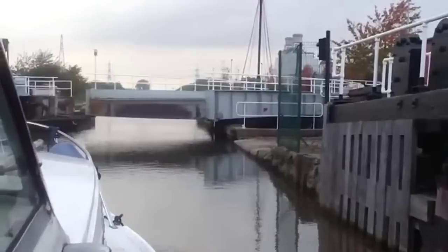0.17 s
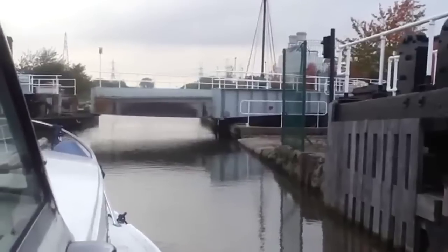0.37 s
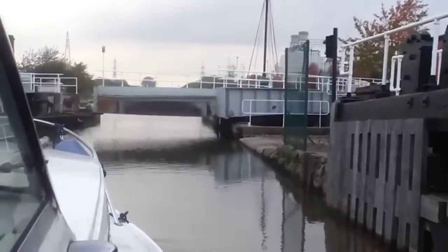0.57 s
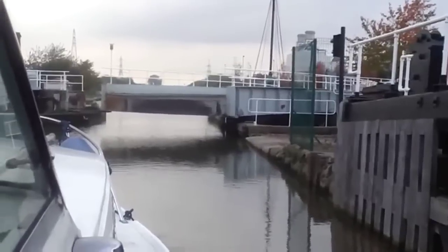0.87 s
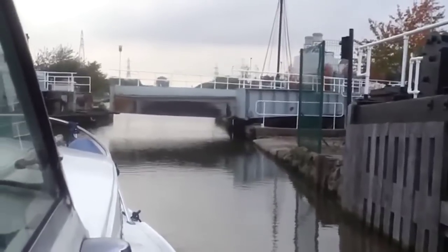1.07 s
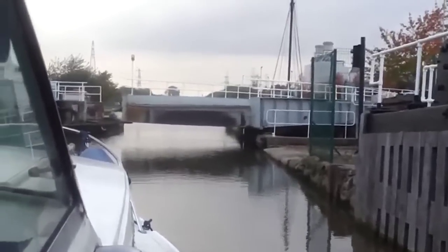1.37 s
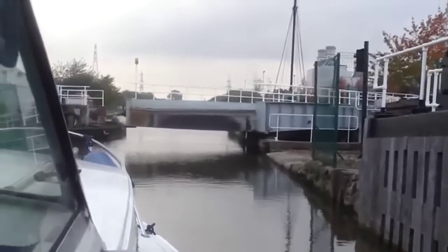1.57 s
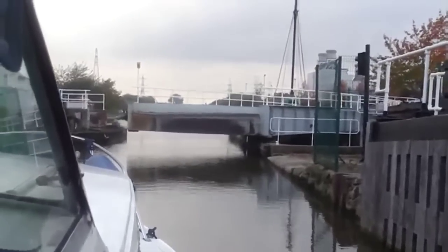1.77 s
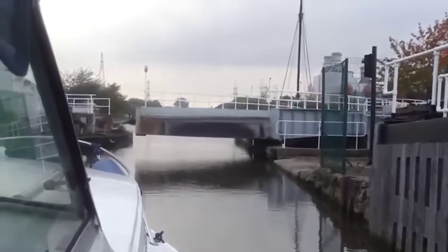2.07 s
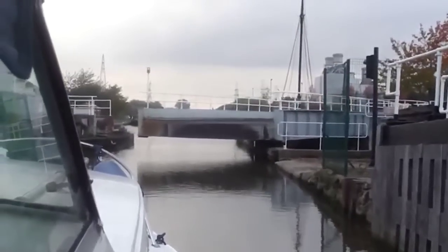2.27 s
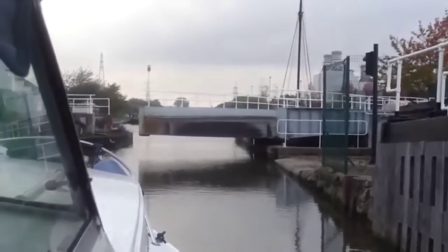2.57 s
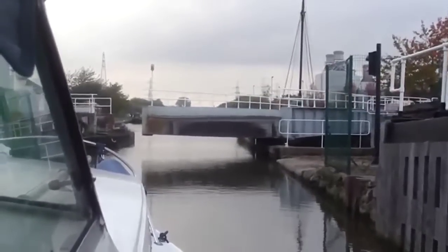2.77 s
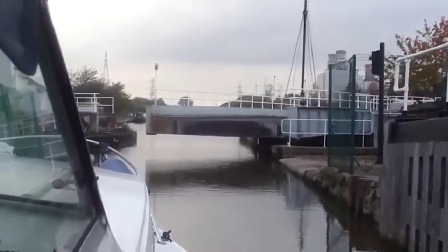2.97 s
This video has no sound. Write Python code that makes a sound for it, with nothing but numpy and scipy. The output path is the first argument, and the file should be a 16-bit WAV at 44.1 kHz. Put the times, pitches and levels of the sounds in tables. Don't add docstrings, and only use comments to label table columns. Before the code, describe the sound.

Small boat engine idling with a low, uneven drone, wet exhaust chuffs and splashing cooling water

```python
import sys
import numpy as np
from scipy import signal
from scipy.fft import rfft, irfft, next_fast_len
from scipy.io import wavfile
from scipy.ndimage import uniform_filter1d, map_coordinates

SR = 44100
rng = np.random.default_rng(int(sys.argv[2]) if len(sys.argv) > 2 else 0)


def put_to_file(sound):
    columns = np.atleast_2d(sound).T
    safe = np.clip(columns, -1, 1)
    whole_steps = np.round(safe * 32767)
    wavfile.write(sys.argv[1], SR, whole_steps.astype(np.int16))


def ratio(d):
    e = np.asarray(d, float) / 20
    return 10 ** e


N = 138033
TIME = np.arange(N) / SR

# f/Hz, density/dB per Hz
WASH_COLOUR = [(25, -50.5), (60, -22.5), (158, -12.5), (364, -9.5), (672, -4.5), (1990, -16.5), (4800, -33),
               (7000, -38.5), (8300, -44)]
# multiple of the fundamental, level/dB
BUZZ_OVERTONES = [(20, -51), (21, -53), (22, -58), (31, -62), (41, -63), (43, -60.5), (44, -62.5),
                  (46, -67), (49, -70), (54, -72), (57, -70)]
# t/s, level/dB
BUZZ_FADE = [
    (0, 5),
    (.43, 5.5),
    (.55, 0),
    (.78, 1),
    (.86, 4.5),
    (.95, 0),
    (1.6, -2.5),
    (2.4, 3),
    (3.13, -7),
]
# t/s, f/Hz, level/dB
GLUGS = [(0.289, 1047, -22), (.42, 1142, -37), (1.738, 5640, -42), (1.91, 3100, -34), (.112, 1515, -30),
         (.137, 1526, -32), (.47, 637, -22), (1.005, 754, -26.5), (1.243, 260, -18.5), (1.395, 247, -20.5),
         (1.53, 494, -22.5), (3.07, 279, -22), (2.4, 1527, -27), (2.464, 1256, -27), (2.911, 1140, -23.5),
         (3.065, 6400, -45)]
# t/s, f/Hz, level/dB, rise/s
LONG_GLUG = (.326, 1555, -25, .019)
# t/s, spread/s, level/dB
SPITS = [(1.755, 0.019, -36), (1.8, 0.02, -41.5), (1.84, 0.013, -35), (1.868, .011, -39.5),
         (2.2, 0.017, -44.5), (2.27, 0.024, -40), (2.41, 0.021, -45.5), (2.475, 0.021, -41.5),
         (2.54, 0.023, -38), (3.07, 0.027, -39.5), (3.125, .015, -44.5)]
# f/Hz, density/dB per Hz
SPIT_COLOUR = [(700, -120), (1200, 2), (2500, 1), (4200, 0), (5300, -3), (6600, -3), (7500, -10),
               (8400, -18)]
# t/s, spread/s, level/dB
SLOPS = [(.048, 0.015, -32.5), (.22, 0.014, -37), (.628, 0.014, -30.5), (.703, 0.015, -31),
         (.823, .012, -30.5), (.915, .01, -30), (.945, .01, -33), (1.174, 0.016, -33),
         (1.363, 0.0092, -27.5), (1.398, 0.0073, -36), (1.49, 0.0086, -29), (1.701, 0.0098, -36),
         (2.678, 0.013, -31), (2.903, 0.014, -31), (2.955, .012, -32), (3.011, .012, -31.5),
         (.3, 0.0098, -43), (.36, 0.025, -32), (.425, 0.02, -29.5), (1.765, 0.016, -27.5),
         (1.815, .012, -30), (2.26, 0.028, -28), (2.41, 0.014, -27.5), (2.472, .013, -26),
         (3.08, 0.043, -29)]
# f/Hz, density/dB per Hz
SLOP_COLOUR = [(500, -120), (750, -3), (1200, 0), (1600, -3), (2500, -11), (3500, -18), (5000, -120)]
# t/s, rate/firings per s
ENGINE_SPEED = [
    (-.1, 18.4),
    (.3, 18.2),
    (.8, 17.75),
    (1.3, 18.15),
    (2, 18.35),
    (3.3, 18.4),
]
# t/s, level/dB
CHUFF_LEVEL = [
    (0, -34),
    (.5, -32.5),
    (1, -33),
    (1.4, -31.5),
    (1.7, -30.5),
    (2.1, -30.5),
    (2.45, -32.5),
    (2.8, -31),
    (3.13, -30.5),
]
# f/Hz, width/Hz, level/dB
PIPE_RESONANCES = [(650, 67, -3), (930, 74, 3.5), (1130, 180, 5), (1500, 180, -5), (1970, 98, -2.5),
                   (2840, 820, -11.5), (4300, 1200, -39)]
# t/s, level/dB
PINGS = [(0.046, -28), (0.156, -28), (0.215, -30), (0.419, -29), (0.486, -27.5), (0.546, -26.5),
         (0.599, -27), (0.651, -27.5), (0.705, -26), (0.847, -26.5), (0.925, -27), (1.151, -28.5),
         (1.258, -35), (1.371, -40), (1.483, -30), (1.703, -33), (1.756, -29.5), (1.808, -29.5),
         (1.975, -30), (2.089, -30), (2.136, -29), (2.194, -35), (2.25, -35), (2.307, -33), (2.356, -27),
         (2.408, -30), (2.459, -34), (2.525, -33), (2.575, -28), (2.681, -33), (2.903, -25.5), (2.962, -33),
         (3.018, -29), (3.12, -27)]
# t/s, level/dB
DRONE_LEVEL = [(0, -20.5), (.1, -22.5), (.15, -24.5), (.19, -21.5), (.43, -21), (.47, -23.5), (.7, -22.5),
               (.74, -25), (.82, -22), (1.02, -22.5), (1.07, -24.5), (1.33, -19.5), (1.48, -24),
               (2.1, -23.5), (2.56, -22), (2.62, -29), (2.67, -24), (3.13, -22)]
# f/Hz, width/Hz, level/dB
HULL_RESONANCES = [(88.5, 22, -11), (122, 28, -12), (242.3, 58, -4), (288.6, 54, -2.5), (362.4, 38, -2.5),
                   (467, 33, -3), (489.3, 24, 1)]
# t/s, f/Hz, level/dB
THUMPS = [(0.073, 383, -21), (0.183, 299, -15), (0.225, 410, -15), (0.263, 340, -13), (0.295, 328, -16.5),
          (0.332, 364, -19), (0.372, 340, -17), (0.43, 390, -13), (0.505, 412, -16.5), (0.592, 344, -15.5),
          (0.683, 316, -15.5), (0.824, 360, -18), (0.911, 316, -16), (0.97, 342, -15.5),
          (1.029, 331, -17.5), (1.126, 336, -20.5), (1.249, 364, -13.5), (1.29, 390, -15),
          (1.316, 345, -13.5), (1.34, 351, -12.5), (1.409, 313, -19), (1.563, 318, -15),
          (1.594, 355, -18.5), (1.685, 286, -15.5), (2.096, 318, -16), (2.122, 322, -20), (2.225, 365, -15),
          (2.279, 326, -17), (2.33, 312, -19.5), (2.382, 378, -20), (2.426, 295, -18), (2.451, 317, -23),
          (2.509, 373, -21), (2.776, 296, -15), (2.886, 344, -18.5), (2.939, 355, -17), (3.022, 393, -17),
          (3.095, 348, -17.5)]
# t/s, level/dB
LULLS = [(0.046, -3), (0.103, -8.5), (0.15, -9), (0.305, -8), (0.449, -5), (0.489, -8), (0.725, -10),
         (0.932, -5.5), (1.084, -3), (1.205, -4), (1.269, -3), (1.299, -4), (1.578, -7), (1.732, -7),
         (1.951, -8), (2.046, -5), (2.19, -5), (2.266, -4.5), (2.344, -8), (2.614, -11), (2.71, -7),
         (2.87, -4), (2.96, -3)]
BAND_EDGES = (7120, 7650)
# from t/s, to t/s
TOP_BAND_SPANS = [(.47, .53), (1.02, 1.08), (1.15, 1.255), (1.28, 1.34), (1.45, 1.51), (1.57, 1.67),
                  (1.72, 1.86), (2, 2.06), (2.39, 2.44), (2.51, 2.57), (2.89, 2.96), (3.04, 3.2)]
# from t/s, to t/s
UPPER_BAND_GAPS = [(.13, .175), (.335, .385), (.56, .6), (.69, .73), (.945, .995), (1.895, 1.962),
                   (2.318, 2.382), (2.66, 2.728)]


def unit(x):
    return x / np.sqrt(np.mean(x ** 2) + 1e-20)


def curve(rows):
    return np.interp(TIME, *np.transpose(rows))


def swell(at, spread):
    return np.exp(-.5 * ((TIME - at) / spread) ** 2)


def wobble(rate):
    knots = rng.standard_normal(int(N * rate / SR) + 4)
    return map_coordinates(knots, [np.arange(N) * rate / SR])


def along(points):
    f, db = np.transpose(points)
    return lambda hz: ratio(np.interp(np.log(hz + 1), np.log(f + 1), db))


def resonances(rows):
    def power(f, centre, width, db):
        damping = (f * width) ** 2
        return ratio(2 * db) * damping / ((centre * centre - f * f) ** 2 + damping)
    return lambda f: np.sqrt(sum(power(f, *row) for row in rows))


def filtered(x, response):
    m = next_fast_len(N + SR // 2)
    return irfft(rfft(x, m) * response(np.fft.rfftfreq(m, 1 / SR)), m)[..., :N]


def rush(response, patchy_db):
    z = signal.stft(rng.standard_normal(N), nperseg=512)[2]
    field = uniform_filter1d(rng.standard_normal(z.shape), size=4, axis=0)
    field = uniform_filter1d(field, size=8, axis=1)
    patchy = signal.istft(z * ratio(patchy_db * unit(field)), nperseg=512)[1][:N]
    return unit(filtered(patchy, response))


def bubbles(s, hz, db, peak_s, rise):
    t = np.arange(SR // 10) / SR
    u = t / peak_s[:, None]
    swelling = ratio(db)[:, None] * (u * np.exp(1 - u)) ** 2
    tone = swelling * np.sin(2 * np.pi * hz[:, None] * t * (1 + rise * u / 2))
    places = np.round(s * SR).astype(int)[:, None] + np.arange(len(t))
    return np.bincount(places.ravel(), tone.ravel(), N + SR)[:N]


def gushes(events, colour):
    flow = sum(ratio(db) * swell(s, spread) for s, spread, db in events)
    grain = ratio(1.5 * wobble(90))
    return flow * grain * rush(along(colour), patchy_db=2.5)


def wash():
    surge_db = uniform_filter1d(curve(DRONE_LEVEL), size=4000)
    surge_db = 0.23 * (surge_db - surge_db.mean())
    level_db = -26 + surge_db + 0.58 * wobble(1.34) + 0.3 * wobble(7.69)
    return ratio(level_db) * rush(along(WASH_COLOUR), patchy_db=0.9)


def buzz():
    fundamental_hz = 100.67
    turns = np.cumsum(fundamental_hz * (1 + .0006 * wobble(6))) / SR
    hum = np.zeros(N)
    for multiple, db in BUZZ_OVERTONES:
        level = np.sqrt(2) * ratio(db + 2 * np.tanh(wobble(5)))
        hum += level * np.sin(2 * np.pi * (multiple * turns + rng.random()))
    return ratio(curve(BUZZ_FADE)) * hum


def gurgle():
    centre_hz, spread_octaves, level_db, peak_cycles = 1102.7, .7, -44, 13.45
    start, luck, length = rng.random((400, 3)).T
    hz = np.clip(centre_hz * 2 ** (spread_octaves * rng.standard_normal(400)), 300, 7000)
    db = level_db - 2.0 * np.log(luck + 0.077) - 5 * np.log2(hz / centre_hz)
    small = bubbles(start * N / SR, hz, db, peak_cycles / hz * (.5 + length), rise=0.0542)
    s, hz, db = np.transpose(GLUGS)
    glugs = bubbles(s, hz, db, np.full(len(s), .011), rise=.008)
    return small + bubbles(*np.transpose([LONG_GLUG]), rise=-.003) + glugs


def spits():
    return gushes(SPITS, SPIT_COLOUR) + gushes(SLOPS, SLOP_COLOUR)


def firings():
    first_turn, scatter_s = .26, .002
    t = np.arange(-SR // 10, N + SR // 10) / SR
    turns = np.cumsum(np.interp(t, *np.transpose(ENGINE_SPEED))) / SR
    chance = rng.standard_normal((int(turns[-1]), 4))
    even_s = np.interp(np.arange(len(chance)) + first_turn, turns, t)
    return even_s + scatter_s * chance[:, 0], np.tanh(chance[:, 1])


def valve_gear():
    rise_s = .007
    s, db = np.transpose(PINGS)
    hz = 2005 * (1 + .008 * rng.standard_normal(len(s)))
    return bubbles(s - rise_s, hz, db, np.full(len(s), rise_s), rise=0)


def exhaust():
    rise_s, size_db, edge_hz = .0105, .5, 4700
    s, size = firings()
    lead = SR // 10
    fires = np.bincount(np.round(s * SR).astype(int) + lead, ratio(size_db * size), N + SR)
    u = np.arange(SR // 5) / SR / rise_s
    puffs = signal.fftconvolve(fires, u ** 2 * np.exp(-u))[lead:][:N]
    pipe = lambda f: resonances(PIPE_RESONANCES)(f) / np.sqrt(1 + (f / edge_hz) ** 8)
    chuffs = unit(puffs ** 0.97 * rush(pipe, patchy_db=2.0))
    return ratio(curve(CHUFF_LEVEL)) * chuffs


def hull():
    edge_hz, throb_db, throb_turn = 491, .6, .12
    thump_s, thump_yield, lull_s = .005, .75, .009
    body = lambda f: resonances(HULL_RESONANCES)(f) / np.sqrt(1 + (f / edge_hz) ** 16)
    throb = np.cos(4 * np.pi * (np.cumsum(curve(ENGINE_SPEED)) / SR - throb_turn))
    lull_db = sum(db * swell(at, lull_s) for at, db in LULLS)
    level_db = curve(DRONE_LEVEL) + lull_db - 0.68 + 0.52 * wobble(9) + throb_db * throb
    drone = ratio(level_db) * rush(body, patchy_db=-0.6)
    s, hz, db = np.transpose(THUMPS)
    thumps = bubbles(s - thump_s, hz, db, np.full(len(s), thump_s), rise=0)
    busy = sum(swell(at, thump_s) for at in s)
    return drone * np.clip(1 - thump_yield * busy, 0, 1) + thumps


def scene():
    return (wash() + buzz() + gurgle() + spits() + valve_gear() + exhaust() + hull())[None]


def during(spans):
    inside = sum((TIME > a) & (TIME < b) for a, b in spans) * 1.
    return uniform_filter1d(inside, size=512)


def roll_off(x):
    return signal.sosfilt(signal.butter(12, 8270, fs=SR, output="sos"), x)


def record(dry):
    low_cut_hz = 72
    x = filtered(dry, lambda f: f ** 3 / np.sqrt(f ** 6 + low_cut_hz ** 6))
    upper, top = (filtered(x, lambda f: f > hz) for hz in BAND_EDGES)
    dulled = (upper - top) * during(UPPER_BAND_GAPS)
    closed = top * (1 - during(TOP_BAND_SPANS))
    return roll_off(x - dulled - closed)


dry = scene()
out = record(dry)
put_to_file(out)
```